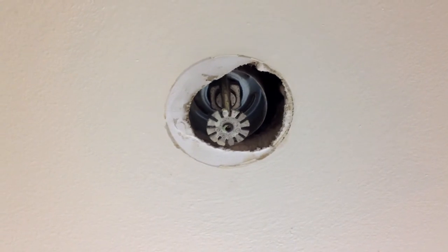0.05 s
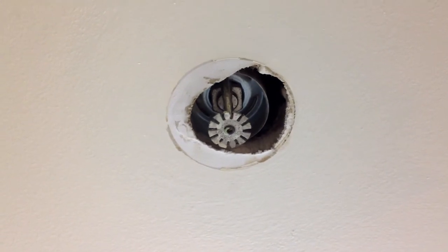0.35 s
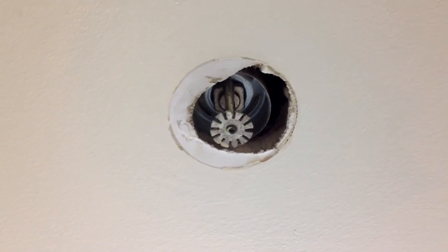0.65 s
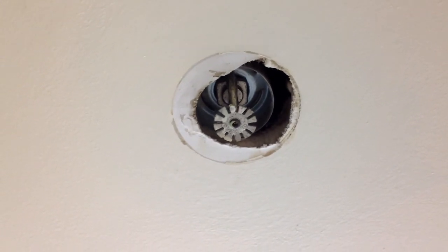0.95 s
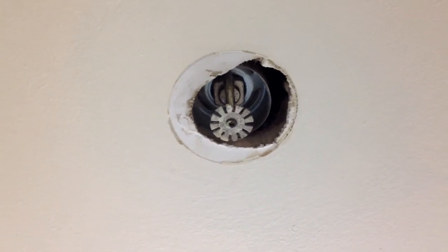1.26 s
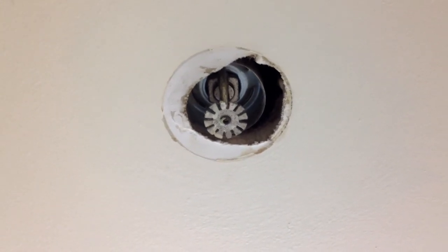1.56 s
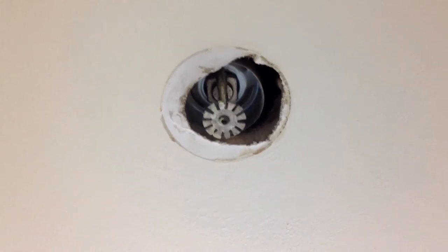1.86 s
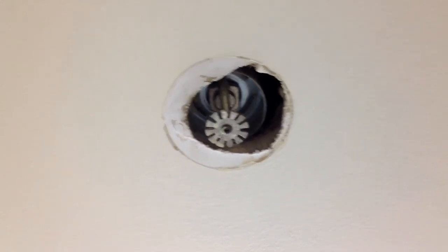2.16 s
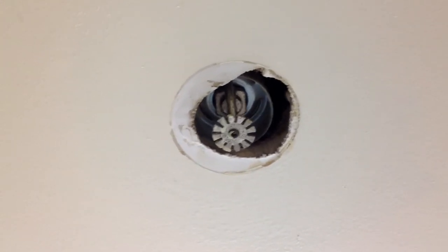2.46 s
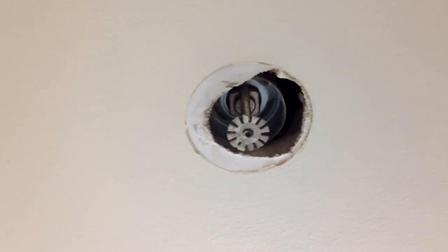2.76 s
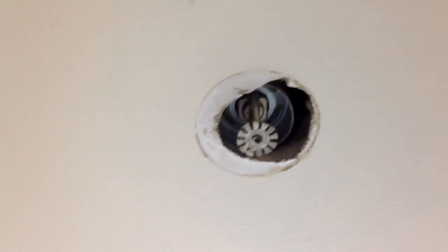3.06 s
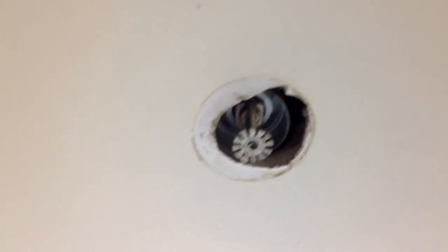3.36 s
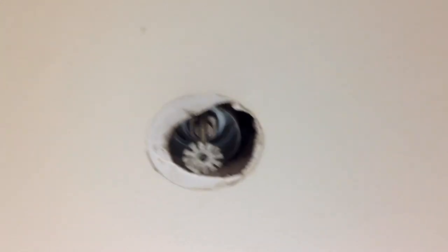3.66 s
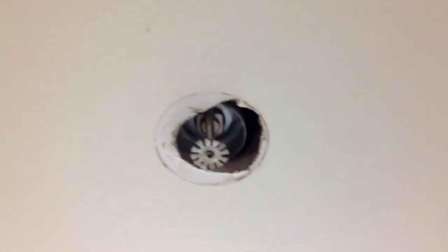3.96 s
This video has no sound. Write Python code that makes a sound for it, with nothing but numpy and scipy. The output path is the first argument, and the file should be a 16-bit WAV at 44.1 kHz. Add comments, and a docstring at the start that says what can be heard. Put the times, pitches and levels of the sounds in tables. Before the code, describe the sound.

A loud bang like a door slamming follows small clicks and a faint motor hum indoors.

```python
"""A heavy bang, like a door slamming, ends this scene in a hard, reverberant room: three quick impacts
excite the modes of a panel and of the room, and a limiter holds the peak. Before it, over a faint motor
hum and room noise, a latch-like clack, light ticks, metal clinks and scuffs sound a little way off, each
with a reverberant tail. Dry handling clicks reach the microphone directly through its case.
Two faint, high scuffs follow the bang."""
import sys
import numpy as np
from scipy import signal
from scipy.fft import rfft, irfft, next_fast_len
from scipy.io import wavfile
from scipy.ndimage import uniform_filter1d, minimum_filter1d, map_coordinates

SR = 44100
rng = np.random.default_rng(int(sys.argv[2]) if len(sys.argv) > 2 else 0)


def pcm_store(signal):
    """Save signal as 16-bit PCM."""
    levels = np.round(np.clip(np.atleast_2d(signal), -1, 1) * 32767)
    wavfile.write(sys.argv[1], SR, levels.astype(np.int16).T)


N = 176400


def amp(db):
    """Amplitude ratio of a level in decibels."""
    return 10 ** (np.asarray(db) / 20)


def along(points, hz):
    """Interpolation of (frequency, value) points on a logarithmic frequency axis."""
    frequencies, values = np.transpose(points)
    return np.interp(np.log(hz + 1), np.log(frequencies + 1), values)


def curve(points):
    """Linear interpolation of (time, value) points, one value per sample."""
    return np.interp(np.arange(N) / SR, *np.transpose(points))


def wobble(rate_hz):
    """Slow random modulation: a spline through Gaussian knots."""
    knots = rng.standard_normal(int(N * rate_hz / SR) + 4)
    return map_coordinates(knots, [np.arange(N) * rate_hz / SR])


def swell(attack_s):
    """Exponential approach to full amplitude, one second long."""
    return 1 - np.exp(-np.arange(SR) / SR / attack_s)


def add(track, start_s, x):
    """Superposition of x on the track."""
    i = round(start_s * SR)
    track[i:i + len(x)] += x[:N - i]


def impulse(gain, size=8192):
    """Minimum-phase response of unit energy, shaped by gain(hz) through the folded cepstrum."""
    magnitude = gain(np.fft.rfftfreq(size, 1 / SR))
    cepstrum = irfft(np.log(np.maximum(magnitude / magnitude.max(), 1e-6)))
    cepstrum[1:size // 2] *= 2
    cepstrum[size // 2 + 1:] = 0
    response = irfft(np.exp(rfft(cepstrum)))[:size // 2] * np.hanning(size)[size // 2:]
    return response / np.linalg.norm(response)


def coloured(x, spectrum):
    """Linear filtering by a spectral shape of (frequency [Hz], relative level [dB]) points."""
    return signal.fftconvolve(x, impulse(lambda hz: amp(along(spectrum, hz))))[:len(x)]


def band(x, centre_hz, octaves):
    """Band-pass filtering with a Gaussian passband in log frequency."""
    bell = lambda hz: np.exp(-.5 * (np.log2((hz + 1) / centre_hz) / octaves) ** 2) + 0.0017
    return signal.fftconvolve(x, impulse(bell))


# Envelope of the motor's second harmonic (time [s], level [dB])
SECOND_HARMONIC = [(0, -50), (.8, -51), (1.2, -53), (1.6, -58), (1.85, -44), (2.05, -40), (2.25, -42),
                   (2.6, -47), (3.0, -57)]
# Upper harmonics of the motor (harmonic number, level [dB])
UPPER_HARMONICS = [(3, -84), (5, -59.5)]
def motor_hum(rotation_hz=104.76):
    """Periodic motion: harmonics of a motor's wavering speed; the second swells and fades."""
    speed_hz = rotation_hz * (1 + 0.00208 * wobble(3.0))
    phase = 2 * np.pi * np.cumsum(speed_hz) / SR
    upper = sum(amp(db + 1.5 * wobble(18.0)) * np.sin(k * phase) for k, db in UPPER_HARMONICS)
    second = amp(curve(SECOND_HARMONIC) + .7 * wobble(7.4)) * np.sin(2 * phase)
    return upper + second


# Spectra of the room noise and of the rush (frequency [Hz], relative level [dB])
FLOOR_SPECTRUM = [(25, -46.5), (58, -15.5), (100, -15.5), (160, -1.5), (230, -1), (290, -9.5), (500, -10),
                  (680, -20.5), (1550, -26), (3500, -36), (7650, -36.5), (9700, -44), (13000, -36)]
RUSH_SPECTRUM = [(150, -48), (400, -2.5), (900, 1), (1500, -10), (3000, -20), (5000, -32.5)]
# Envelope of the rush (time [s], level [dB])
RUSH_ENVELOPE = [(0, -52), (.66, -63.5), (.73, -57.5), (.86, -70), (.97, -58), (1.1, -65.5), (1.15, -58.5),
                 (1.28, -57.5), (1.38, -67), (1.47, -57), (1.6, -63.5), (1.9, -67), (2.7, -70),
                 (3.1, -56.5), (3.4, -57.5)]
def room_noise(floor_db=-54.5):
    """Filtered Gaussian noise: a stationary floor and a soft, amplitude-modulated midrange rush."""
    floor = amp(floor_db) * coloured(rng.standard_normal(N + SR), FLOOR_SPECTRUM)[SR:]
    rush_gain = amp(curve(RUSH_ENVELOPE) + wobble(5.6))
    rush = coloured(rng.standard_normal(N + SR), RUSH_SPECTRUM)[SR:]
    return floor + rush_gain * rush


# Decay of the room (frequency [Hz], reverberation time T60 [s])
ROOM_T60 = [(60, 0.14), (170, 1.07), (300, 1.29), (600, 1.23), (1300, 0.78), (2500, 0.69), (5000, 0.73),
            (12000, 0.59)]
def reverberation(attack_s):
    """Diffuse field: dense reflections merge into noise that decays exponentially in each band."""
    hz, t, spectra = signal.stft(rng.standard_normal(SR * 3 // 2), SR, nperseg=256)
    decay = amp(-60 * t / along(ROOM_T60, hz)[:, None])
    tail = signal.istft(spectra * decay, SR)[1][:SR]
    return tail * swell(attack_s)


def ring(modes, t60s, attack_s, drift_cycles=.04):
    """Free vibration: damped modes whose phases drift a little as their echoes mingle."""
    t = np.arange(SR) / SR
    tones = np.zeros(SR)
    for (hz, db), t60, start_phase in zip(modes, t60s, rng.random(len(modes))):
        cycles = hz * t + start_phase + drift_cycles * wobble(rate_hz=12)[:SR]
        tones += amp(db - 60 * t / t60) * np.sin(2 * np.pi * cycles)
    return tones * swell(attack_s)


# Knocks of the clack (time [s], level [dB])
KNOCKS = [(.190, -28.5), (0.233, -43.5)]
# Spectrum of each knock (frequency [Hz], relative level [dB])
KNOCK_SPECTRUM = [(60, -37), (130, -7.5), (232, 5), (280, -11.5), (390, -2.5), (520, -17), (1270, -24.5),
                  (1430, -13), (1740, -21), (2300, -23), (3300, -31.5), (4400, -45), (14000, -58.5)]
# Modes of the hollow ring (frequency [Hz], level [dB])
HOLLOW_MODES = [(231.5, -39), (343, -36), (404, -40), (1378, -40.5), (1420, -41), (1442, -37.5),
                (1936, -42.5)]
def clack(t60_s=0.54):
    """Impact excitation: two knocks reverberate, and the first starts a hollow modal ring."""
    out = np.zeros(N)
    for start_s, db in KNOCKS:
        add(out, start_s, amp(db) * coloured(reverberation(attack_s=0.00044), KNOCK_SPECTRUM))
    add(out, KNOCKS[0][0], ring(HOLLOW_MODES, [t60_s] * len(HOLLOW_MODES), attack_s=0.015))
    return out


def crack(t60_s):
    """Broadband transient: white noise under an exponential decay."""
    return rng.standard_normal(SR) * amp(-60 * np.arange(SR) / SR / t60_s)


def snap(direct_db=12.5):
    """Direct and reverberant sound of a small contact."""
    return reverberation(attack_s=0.00061) + amp(direct_db) * crack(t60_s=0.021)


# Light contacts in the room (time [s], level [dB], centre frequency [Hz], width [octaves])
TICK_CONTACTS = [(.790, -65, 9300, .3), (0.877, -66.5, 9900, 0.63), (2.944, -58, 2050, 0.41),
                 (3.274, -51, 1530, 0.18)]
def ticks():
    """Band-limited transients: each small contact radiates in a single band."""
    out = np.zeros(N)
    for start_s, db, centre_hz, octaves in TICK_CONTACTS:
        add(out, start_s, amp(db) * band(snap(), centre_hz, octaves))
    return out


# Pulses in the case (time [s], peak level before limiting [dB], low edge [Hz], roll-off knee [Hz],
# top edge [Hz], relative level of the fizz past that edge [dB])
CASE_PULSES = [(.9040, -29.5, 139, 610, 3630, -12), (1.671, -4, 260, 1810, 3940, -22),
               (1.784, -34.5, 243, 620, 3680, -29), (1.7874, -27.5, 260, 352, 2750, -42),
               (1.9290, 3, 448, 1160, 3140, -6.5), (2.1202, -33, 2090, 2960, 6470, -2),
               (2.212, -37.5, 283, 390, 1000, -29), (2.712, -38.5, 1450, 3480, 6340, -22),
               (3.188, -36, 243, 296, 1030, -36)]
def handling_clicks(rattle_gain=.032, rattle_t60_s=.012, low_cut_hz=115):
    """Structure-borne sound: dry pulses reach the microphone through its briefly rattling case."""
    out = np.zeros(N)
    t = np.arange(SR // 20) / SR
    low_cut = lambda hz: 1 / np.hypot(1, (low_cut_hz / (hz + 1)) ** 4)
    for start_s, db, low_hz, knee_hz, top_hz, fizz_db in CASE_PULSES:
        low_edge = lambda hz: (hz / low_hz) ** 2 / np.hypot(1, (hz / low_hz) ** 2)
        body = lambda hz: low_edge(hz) / np.hypot(1, (hz / knee_hz) ** 2)
        top_edge = lambda hz: 1 / np.hypot(1, (hz / top_hz) ** 20)
        fizz = lambda hz: amp(fizz_db) / np.hypot(1, (hz / 6500) ** 4)
        response = impulse(lambda hz: body(hz) * (top_edge(hz) + fizz(hz)) * low_cut(hz))
        rattle = rattle_gain * rng.standard_normal(len(t)) * amp(-60 * t / rattle_t60_s)
        pulse = signal.fftconvolve(response, (t == 0) + rattle)
        add(out, start_s, -amp(db) * pulse / abs(pulse).max())
    return out


# Touches on a small metal part (time [s], level [dB], low edge [Hz])
METAL_TOUCHES = [(.925, -65.5, 3600), (2.885, -59, 1500)]
# Resonances of the part (frequency [Hz], relative level [dB])
METAL_RESONANCES = [(1870, 4), (2520, -0.5), (3800, -9), (5500, -7), (8000, -8), (10900, -12)]
def clinks(half_width_hz=380):
    """Damped resonance: metal rings briefly in broad peaks; the lighter touch misses the low ones."""
    out = np.zeros(N)
    metal = lambda hz: sum(amp(db) / (1 + ((hz - centre_hz) / half_width_hz) ** 2)
                           for centre_hz, db in METAL_RESONANCES)
    for start_s, db, low_hz in METAL_TOUCHES:
        response = impulse(lambda hz: metal(hz) / np.hypot(1, (low_hz / (hz + 1)) ** 4))
        add(out, start_s, amp(db) * signal.fftconvolve(snap(), response))
    return out


# Soft rubs (time [s], level [dB], centre frequency [Hz], width [octaves], attack [s])
RUBS = [(3.256, -47.5, 1450, 0.67, 0.01), (3.266, -62, 3360, 1, 0.0072), (3.825, -53, 7900, 1, 0.011),
        (3.93, -53.5, 9000, 0.79, 0.042)]
def scuffs():
    """Friction noise: each rub builds up in one band and decays with the room."""
    out = np.zeros(N)
    for start_s, db, centre_hz, octaves, attack_s in RUBS:
        add(out, start_s, amp(db) * band(reverberation(attack_s), centre_hz, octaves))
    return out


# Impacts of the panel (time [s], boom level [dB], crash level [dB])
IMPACTS = [(3.466, -24, -45), (3.481, -20.5, -31.5), (3.4994, -11, -31.5)]
# Spectra of the boom and of the bright crash (frequency [Hz], relative level [dB])
BOOM_SPECTRUM = [(60, -39), (110, -25.5), (175, -2.5), (225, -23), (290, -1.5), (820, -2.5), (1000, -10.5),
                 (1270, -4.5), (1600, -12), (2200, -22), (4500, -40), (9000, -100)]
CRASH_SPECTRUM = [(1000, -18), (2300, 0), (3200, 5), (4300, -3), (6500, 0), (11000, -1), (15000, -2)]
# Modes of the panel and room (frequency [Hz], level [dB])
PANEL_ROOM_MODES = [(179, -25), (286, -18), (309, -19), (336, -18), (390, -15.5), (437, -16.5),
                    (454, -16.5), (490, -15.5), (543, -25), (600, -16.5), (659, -13), (705, -21),
                    (767, -25), (815, -16.5), (867, -25), (1086, -26.5), (1147, -19), (1256, -21.5),
                    (1443, -27), (1626, -30.5)]
def bang(crash_attack_s=0.0017, lowest_t60_s=1.7, upper_t60_s=0.86):
    """Impulsive excitation: each impact booms and crashes; the last and hardest rings the modes."""
    out = np.zeros(N)
    for start_s, boom_db, crash_db in IMPACTS:
        boom = coloured(reverberation(attack_s=0.00026), BOOM_SPECTRUM)
        add(out, start_s, amp(boom_db) * boom)
        direct = swell(crash_attack_s) * crack(t60_s=.16)
        reflected = amp(-3) * reverberation(crash_attack_s)
        add(out, start_s, amp(crash_db) * coloured(direct + reflected, CRASH_SPECTRUM))
    t60s = [lowest_t60_s] + [upper_t60_s] * (len(PANEL_ROOM_MODES) - 1)
    add(out, IMPACTS[-1][0], ring(PANEL_ROOM_MODES, t60s, attack_s=.003))
    return out


# Low pressure pulses (centre time [s], frequency [Hz], level [dB], 1/e half-length [s])
AIR_PULSES = [(3.49, 258, -13.5, 0.011), (3.509, 176.3, -13.5, 0.012), (3.516, 56, -40, 0.015)]
def thumps():
    """Volume displacement: the panel pushes air as it seats, radiating low Gaussian tone bursts."""
    out = np.zeros(N)
    for centre_s, hz, db, half_length_s in AIR_PULSES:
        t = np.arange(N) / SR - centre_s
        out += amp(db) * np.exp(-(t / half_length_s) ** 2) * np.sin(2 * np.pi * hz * t)
    return out


def scene():
    """Superposition: the pressures of all sources add in one channel."""
    events = bang() + thumps() + clack() + ticks() + clinks() + scuffs() + handling_clicks()
    return (events + motor_hum() + room_noise())[None]


def record(dry, ceiling=1, window_s=0.0043, cutoff_hz=15330):
    """Peak limiting by a smoothed gain that dips around each overload, then an ideal low-pass."""
    window = int(window_s * SR)
    needed_gain = np.minimum(1, ceiling / (abs(dry) + 1e-9))
    gain = uniform_filter1d(minimum_filter1d(needed_gain, window), window)
    size = next_fast_len(N + SR // 2)
    passband = np.fft.rfftfreq(size, 1 / SR) < cutoff_hz
    return irfft(rfft(dry * gain, size) * passband, size)[:, :N]


dry = scene()
out = record(dry)
pcm_store(out)
```